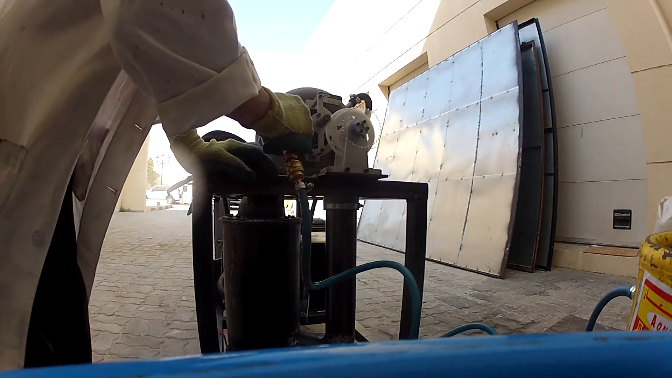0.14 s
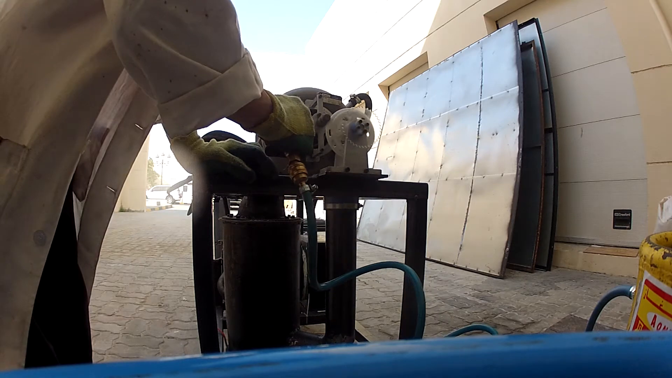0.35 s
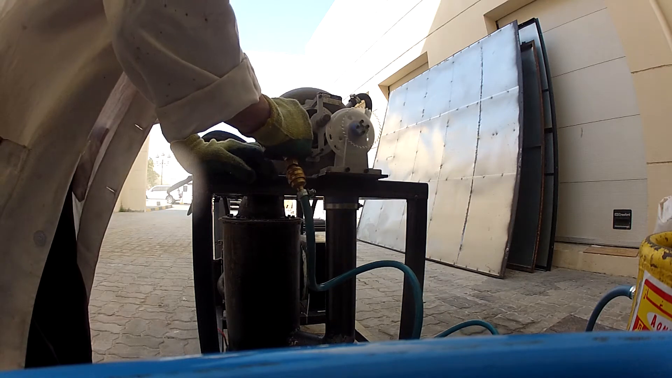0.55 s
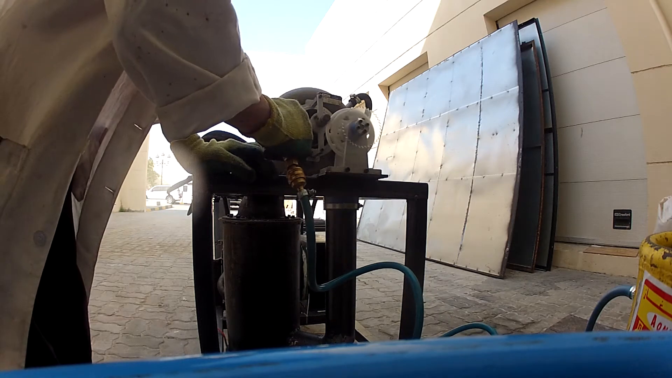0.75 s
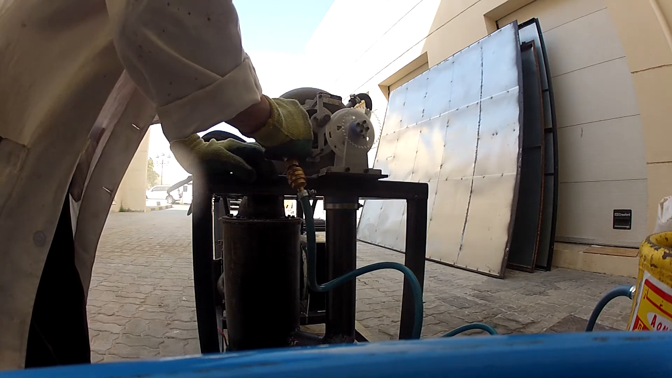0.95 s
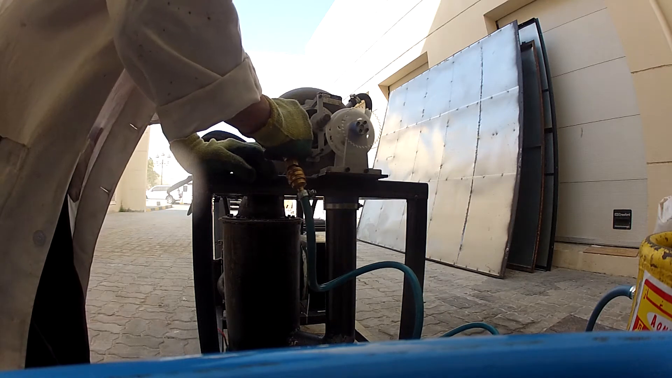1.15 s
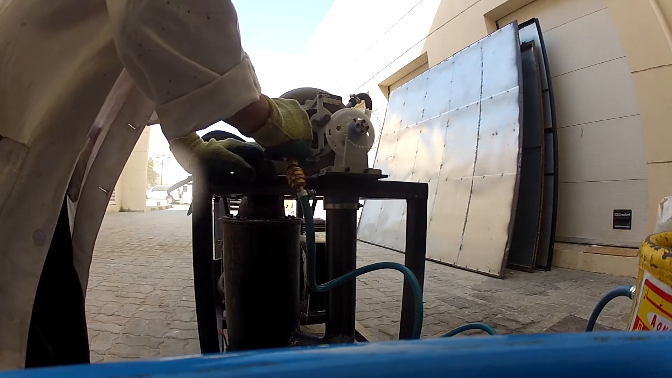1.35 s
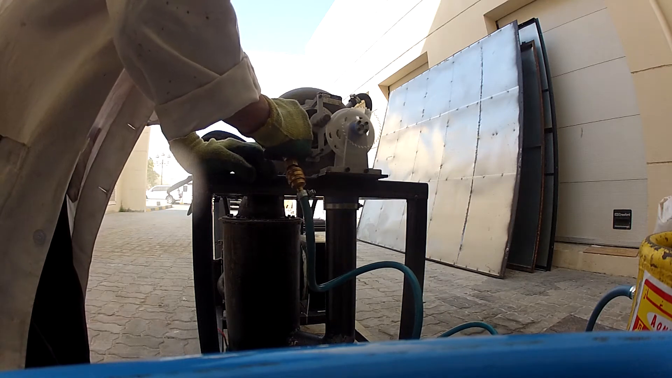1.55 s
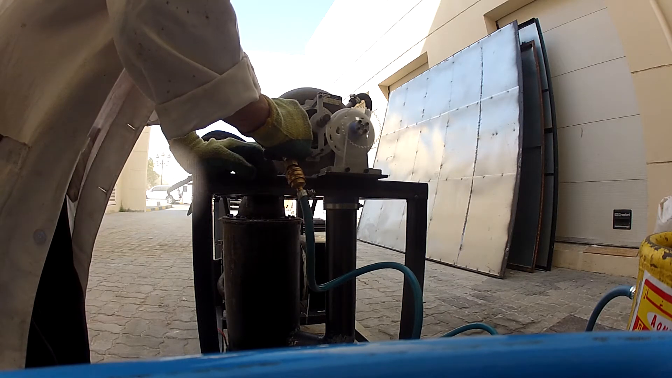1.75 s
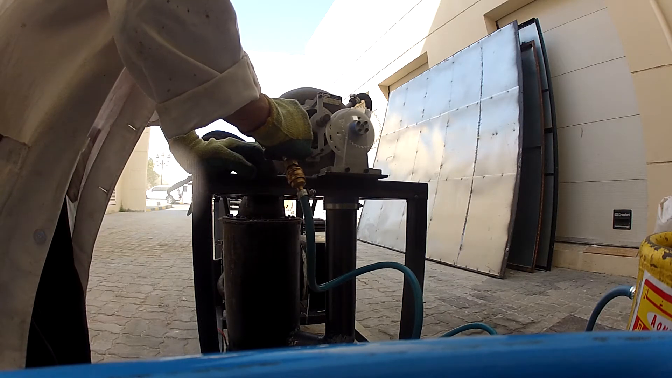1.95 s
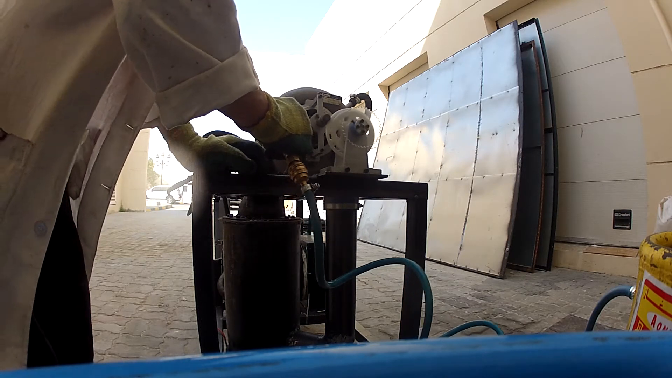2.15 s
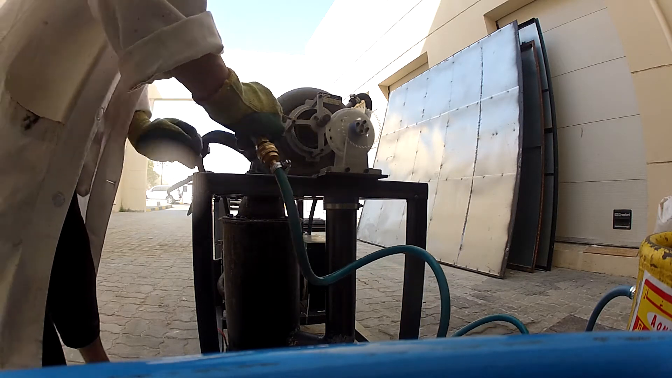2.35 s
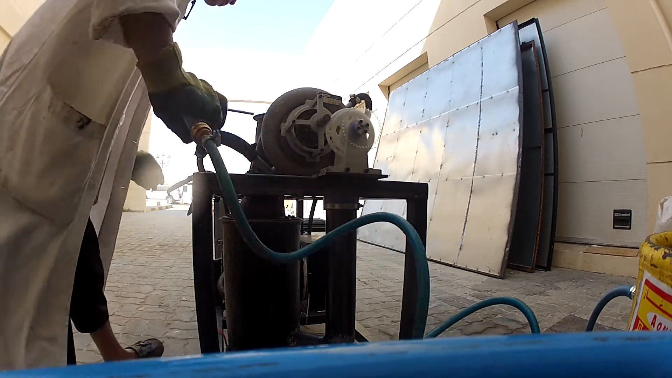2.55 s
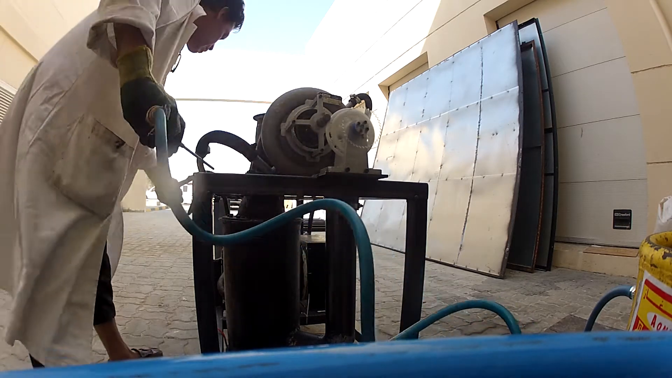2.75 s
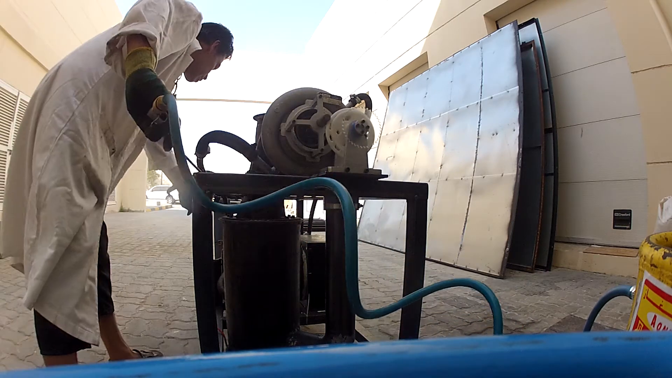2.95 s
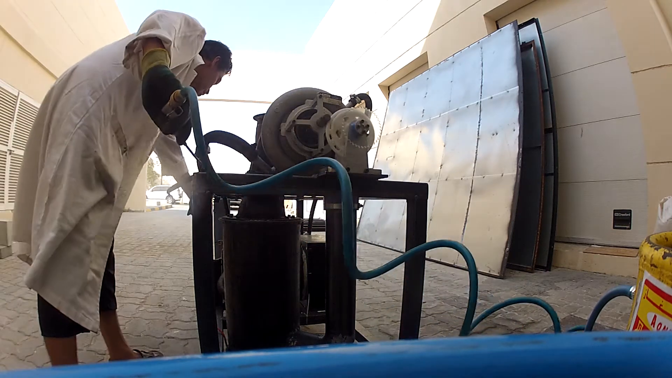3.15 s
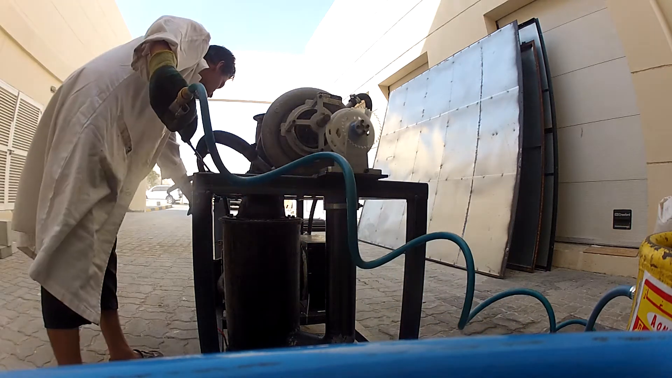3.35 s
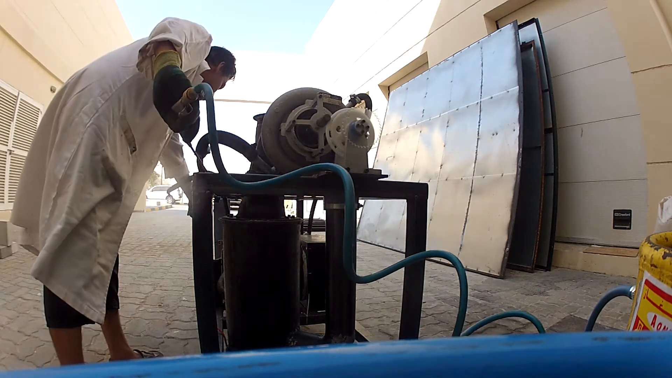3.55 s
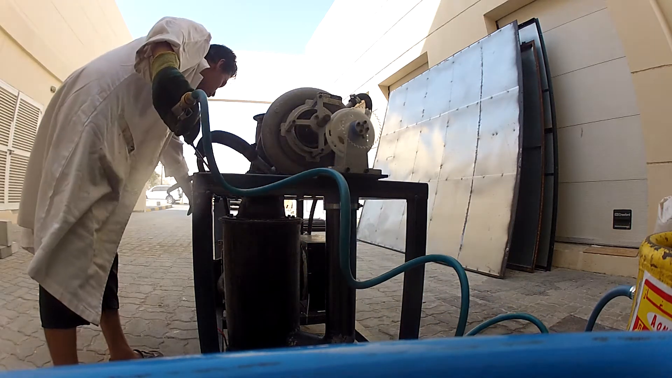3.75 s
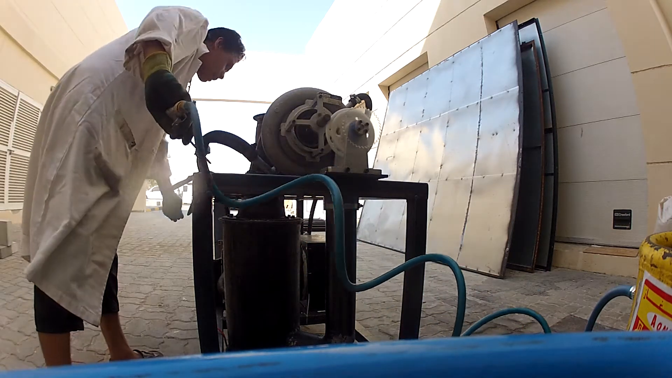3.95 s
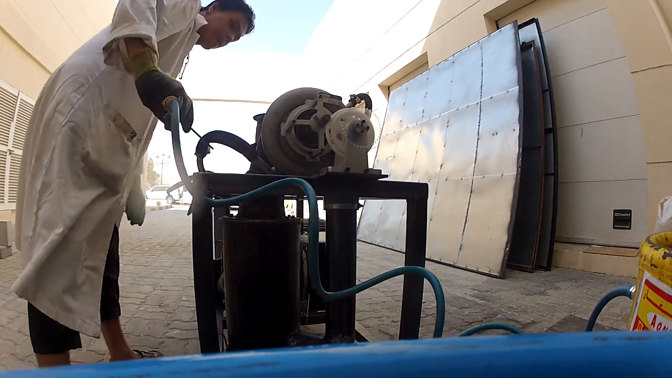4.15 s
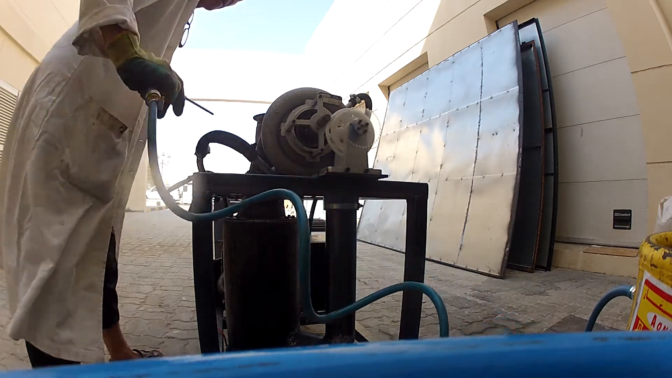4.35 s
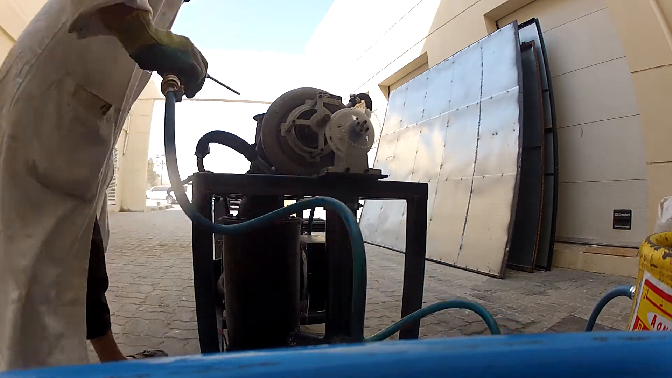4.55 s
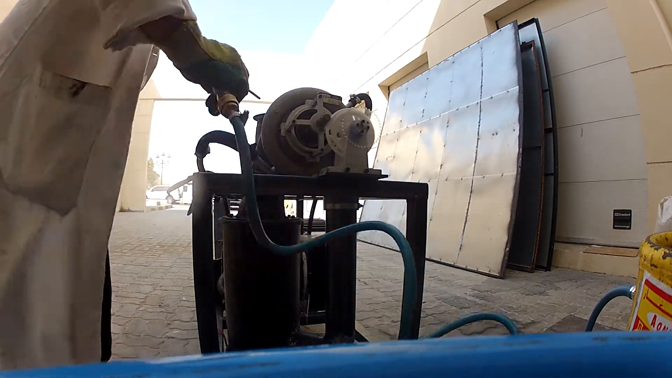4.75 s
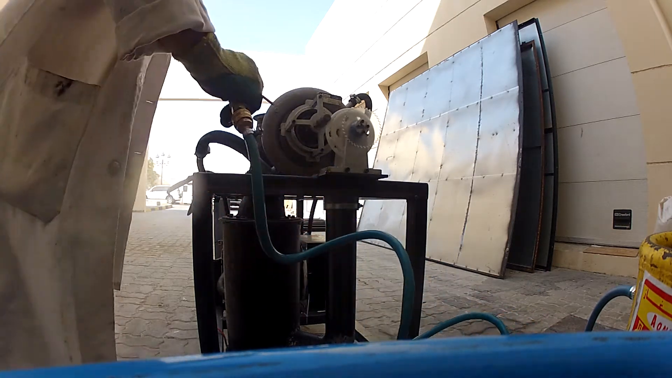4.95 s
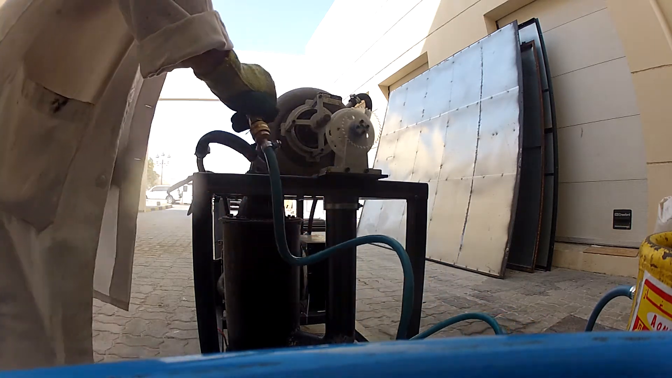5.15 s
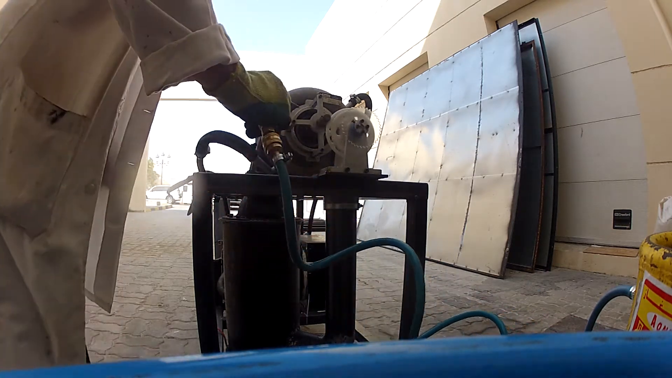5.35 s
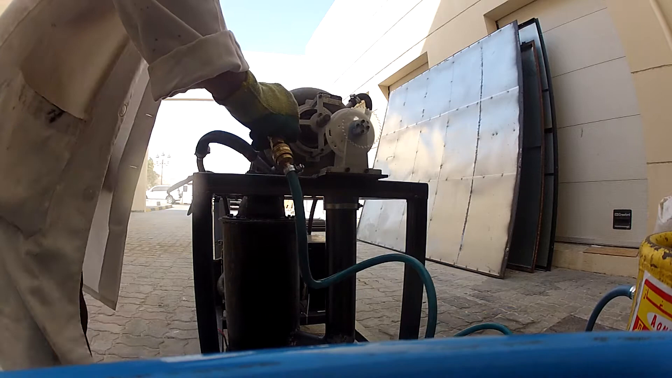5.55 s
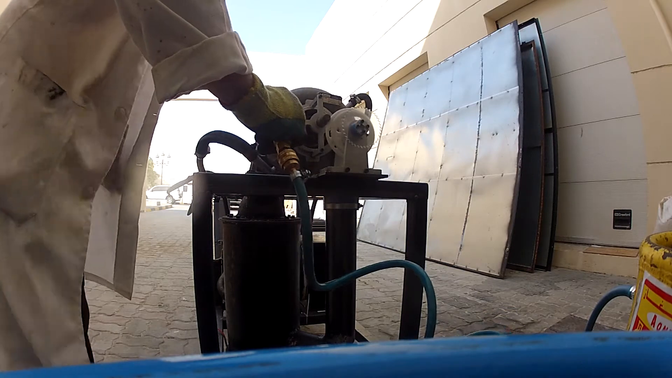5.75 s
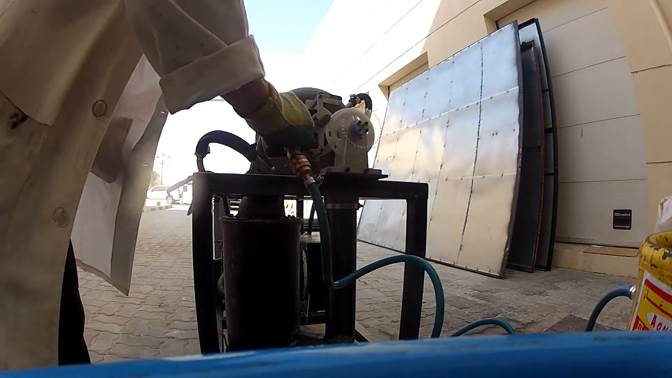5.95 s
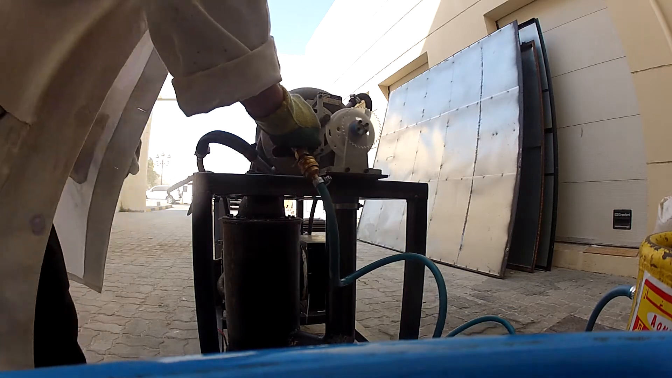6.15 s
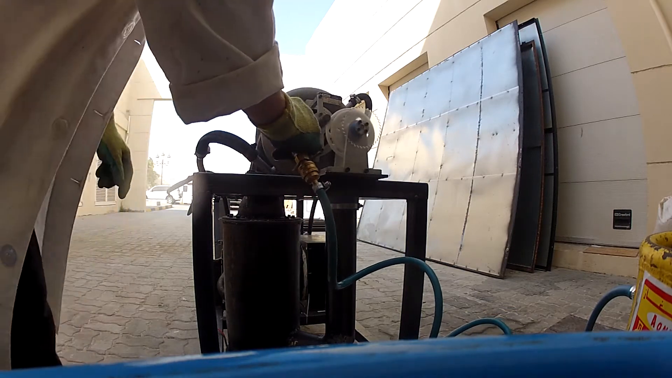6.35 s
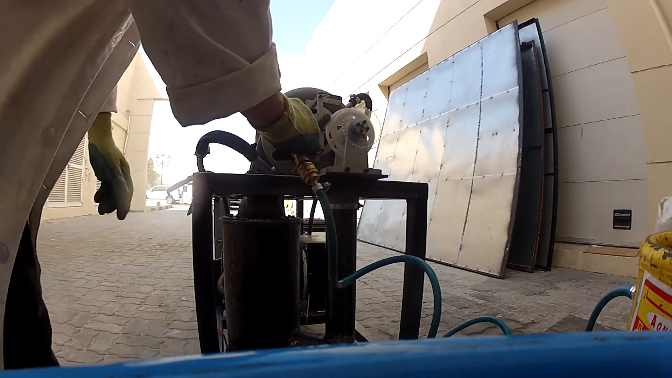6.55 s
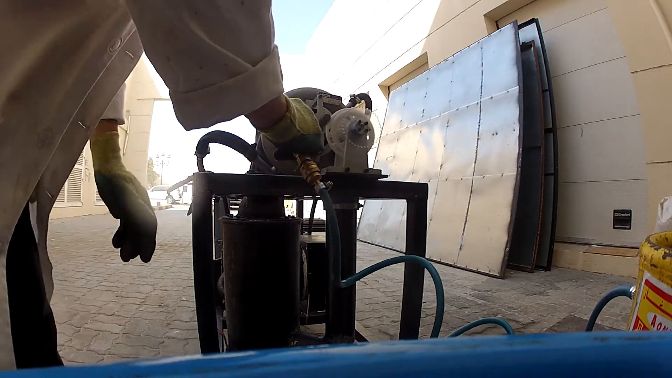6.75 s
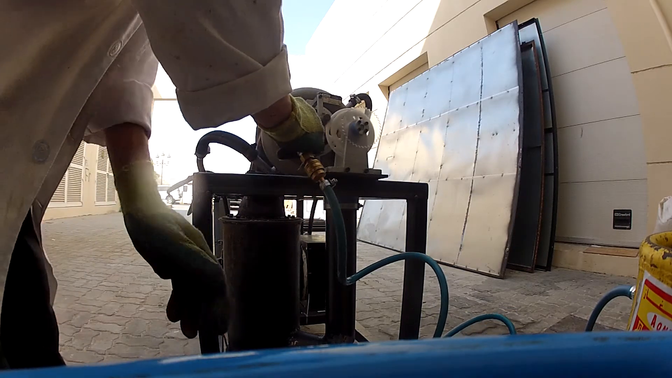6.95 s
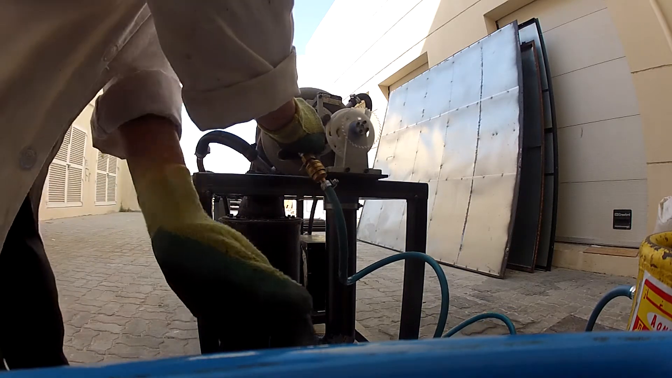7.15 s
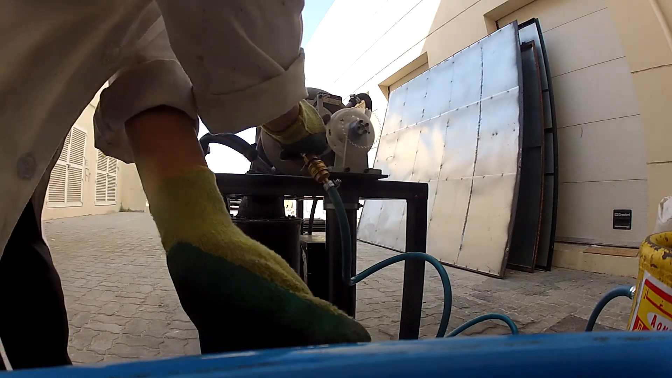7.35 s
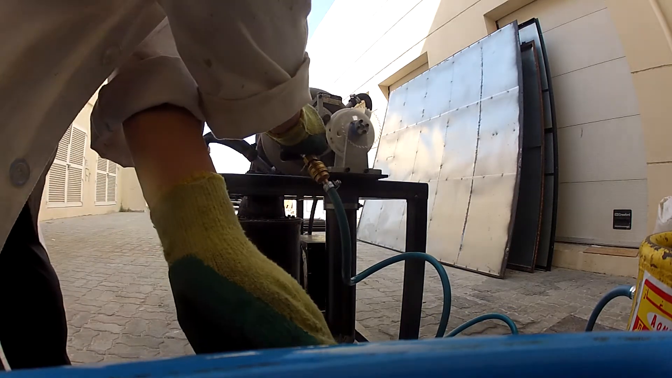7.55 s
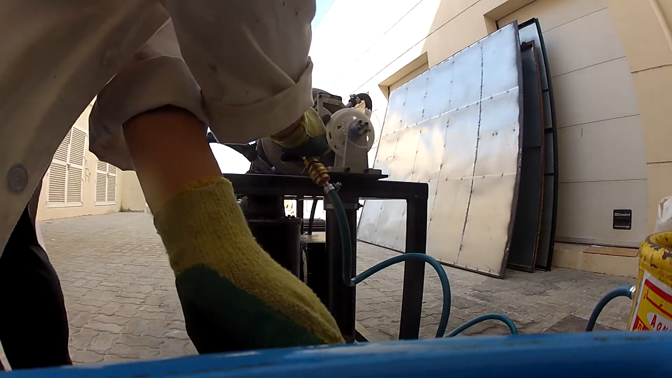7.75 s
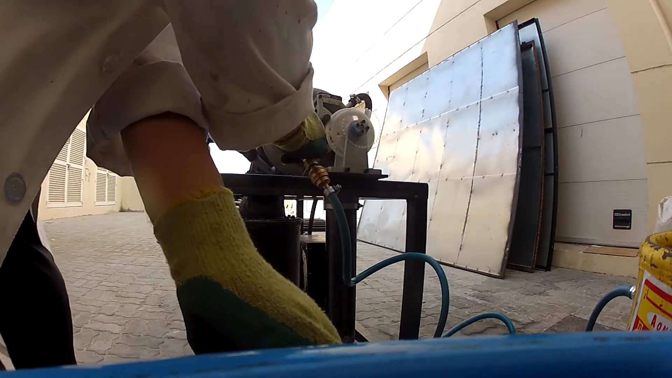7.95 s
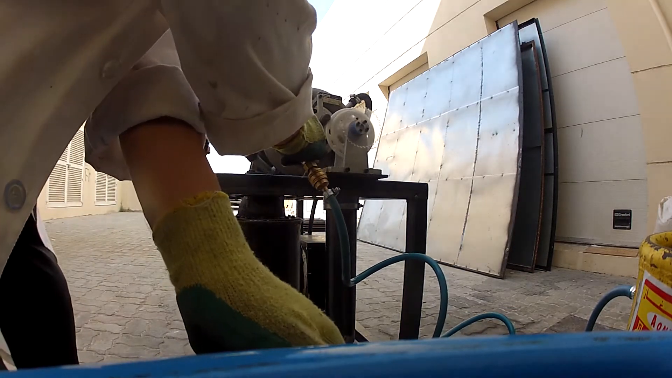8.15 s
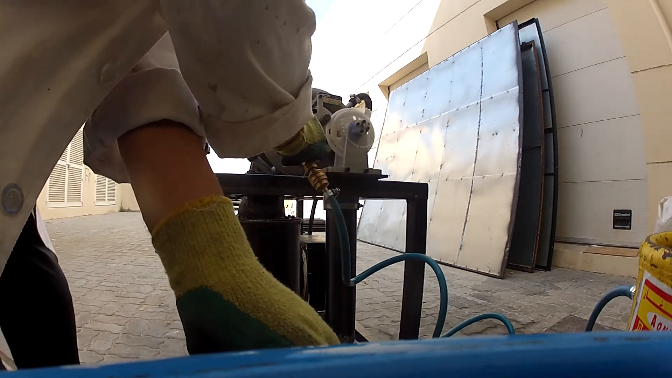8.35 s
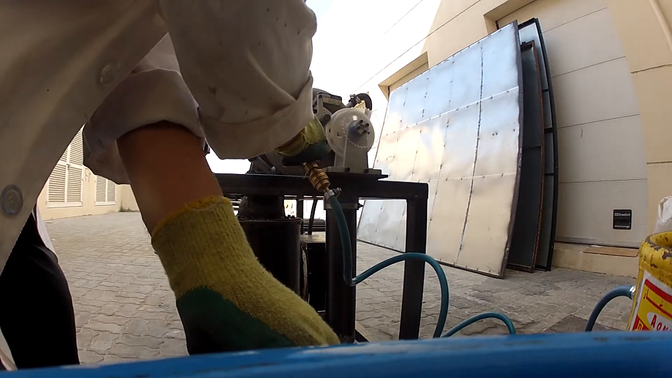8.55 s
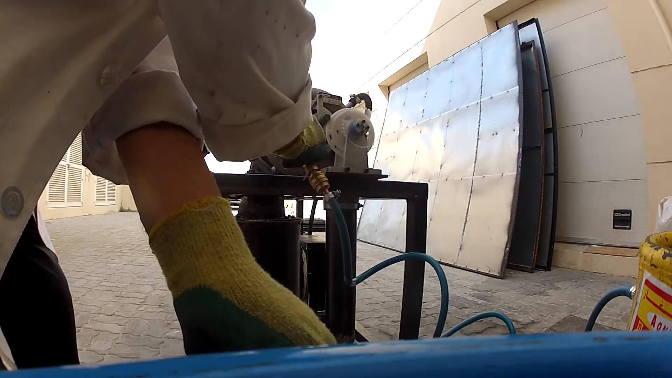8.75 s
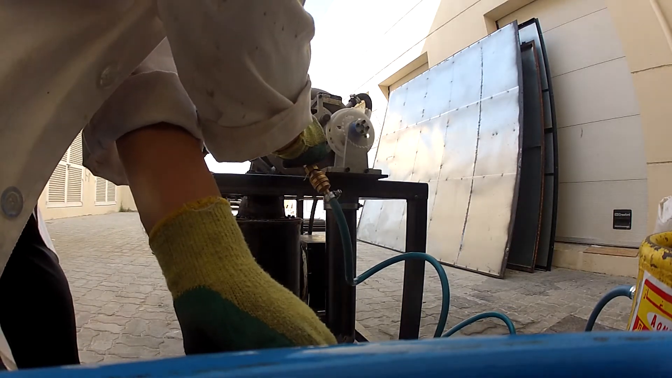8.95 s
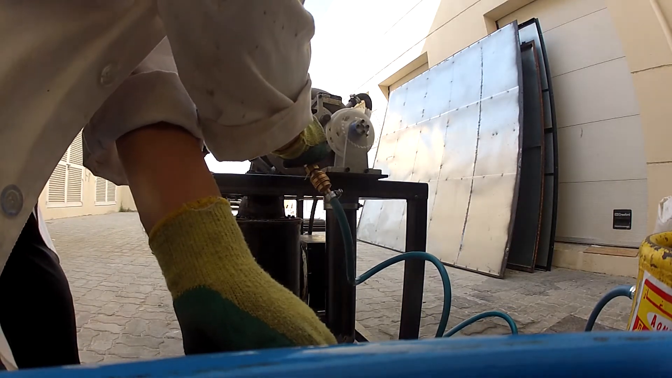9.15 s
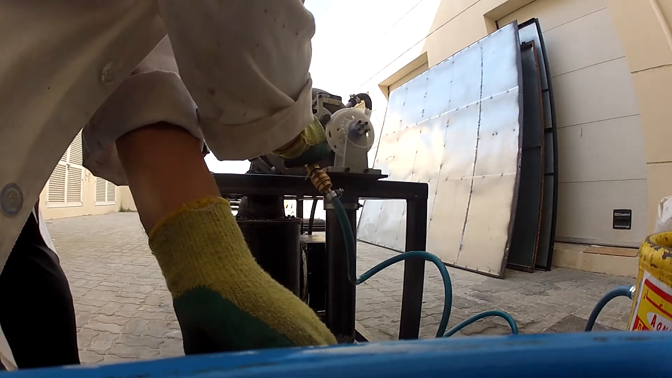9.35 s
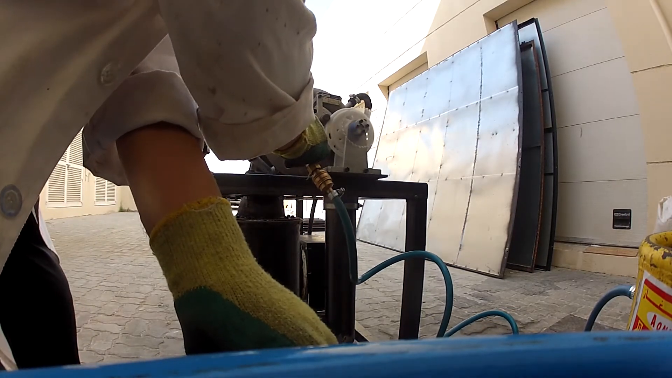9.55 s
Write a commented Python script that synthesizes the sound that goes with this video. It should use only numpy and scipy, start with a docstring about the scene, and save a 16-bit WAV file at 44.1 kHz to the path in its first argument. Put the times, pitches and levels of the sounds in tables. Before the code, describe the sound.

Compressed air blasts into a small metal turbine, its buzzy whine climbing in pitch, stops abruptly, then blows again and drives the whine higher.

```python
"""Air gun spinning a small turbine

An air gun gives two long blows into a small turbine on a steel stand in a walled yard. The jet is noise in three
bands and the rotor chops it into a rising whine of five sine orders; both ring through the same casing modes.
A faint ringing rattle, wind rumble, a distant hum, thumps and scuffs fill the gap between the blows.
A gain control turns loud moments down, and a coarse sample-and-hold mirrors the sound into the treble."""
import sys
import numpy as np
from scipy import signal
from scipy.fft import rfft, irfft, next_fast_len
from scipy.io import wavfile
from scipy.ndimage import uniform_filter1d, minimum_filter1d, map_coordinates

SR = 44100
rng = np.random.default_rng(int(sys.argv[2]) if len(sys.argv) > 2 else 0)


def persist_wave(psi):
    """Save psi, clipped to +-1, as 16-bit WAV."""
    counts = np.round(np.clip(psi, -1, 1) * 32767).astype(np.int16)
    wavfile.write(sys.argv[1], SR, np.atleast_2d(counts).T)


N = 422919


def amp(db):
    """Decibels to linear gain."""
    return 10 ** (np.asarray(db) / 20)


def unit(x):
    """Scale to an RMS of one."""
    return x / np.sqrt(np.mean(x ** 2) + 1e-20)


def curves(rows):
    """One value per sample for each column after the time."""
    times_s, *columns = np.transpose(rows)
    return [np.interp(np.arange(N) / SR, times_s, column) for column in columns]


def wobble(rate):
    """A smooth random curve with rate knots a second."""
    knots = rng.standard_normal(int(N * rate / SR) + 4)
    return map_coordinates(knots, [np.arange(N) * rate / SR])


def filtered(x, response):
    """Multiply the spectrum of x by a complex response of frequency."""
    size = next_fast_len(N + SR // 2)
    return irfft(rfft(x, size) * response(np.fft.rfftfreq(size, 1 / SR)), size)[..., :N]


def spectrum(points):
    """Gain curve through (Hz, dB) points on a log frequency axis."""
    hz, db = np.transpose(points)
    return lambda f: amp(np.interp(np.log(f + 1), np.log(hz + 1), db))


def resonance(f, hz, width):
    """Response of one damped mode, with a gain of one at its centre."""
    return 1j * f * width / (hz * hz - f * f + 1j * f * width)


def span(start, end, rise, fall):
    """Gate open from start to end, with exponential flanks (s per 60 dB)."""
    t = np.arange(N) / SR
    return amp(-60 * np.maximum(start - t, 0) / rise - 60 * np.maximum(t - end, 0) / fall)


def patchy(depth_db):
    """White noise whose strength drifts in patches of time and frequency."""
    bins = signal.stft(rng.standard_normal(N), nperseg=512)[2]
    field = rng.standard_normal(bins.shape)
    field = uniform_filter1d(uniform_filter1d(field, 8, 0), 6, 1)
    return signal.istft(bins * amp(depth_db * unit(field)), nperseg=512)[1][:N]


# Colour of the distant hum: freq_hz, gain_db (relative, on white noise)
HUM_COLOUR = [(60, -40), (130, -14), (200, -0.5), (350, -4.5), (600, -4), (850, -4.5), (1000, -25),
              (1500, -45), (2500, -120)]


def distant_hum():
    """A steady low bed: patchy noise shaped by the hum's colour."""
    return amp(-43.5) * unit(filtered(patchy(1.7), spectrum(HUM_COLOUR)))


# Fuzzy tones in the hum: pitch_hz, width_hz (of each of two passes), level_db (RMS)
HUM_DRONES = [(198.6, 15, -52.5), (285.6, 9, -60.5), (494.8, 13.5, -50.5)]


def drones():
    """Narrow bands of noise that stand out of the hum, each passed twice through one resonance."""
    out = np.zeros(N)
    for hz, width, db in HUM_DRONES:
        band = filtered(rng.standard_normal(N), lambda f: resonance(f, hz, width) ** 2)
        out += amp(db) * unit(band)
    return out


# Strength of the wind: time_s, level_db
WIND_LEVEL = [(0, -37), (.5, -34), (1.5, -35), (2.3, -38.5), (2.7, -46), (3.1, -39), (4.2, -43.5),
              (4.9, -42.5), (6.1, -43.5), (6.5, -38), (7.1, -41.5), (8.3, -42.5), (9.59, -48.5)]
# Colour of the wind rumble: freq_hz, gain_db (relative, on white noise)
WIND_COLOUR = [(12, -30), (22, -1.5), (45, -1), (90, -0.5), (150, -8), (250, -26), (500, -60), (1000, -120)]


def wind():
    """Low rumble that comes in separate lumps: noise of randomly swelling strength, then low-passed."""
    lumps = amp(4.7 * np.tanh(0.8 * wobble(18)))
    rumble = filtered(rng.standard_normal(N) * lumps, spectrum(WIND_COLOUR))
    return amp(curves(WIND_LEVEL)[0]) * unit(rumble)


# Soft thumps: time_s, peak_db (nominal), pitch_hz
HANDLING_THUMPS = [(2.321, -30, 56.5), (2.347, -21.5, 64.6), (2.417, -22.5, 113), (2.459, -26, 70.4),
                   (3.049, -31, 48.4), (3.119, -33, 56.5), (3.398, -24, 67.3), (3.423, -30, 86.1),
                   (3.719, -26, 130), (3.799, -28, 45.8), (4.101, -28, 94.2), (4.689, -28, 172),
                   (4.859, -29, 75.4), (5.524, -23, 205)]


def thumps():
    """Soft low knocks, each a dip in pressure between two small swells."""
    out, t = np.zeros(N), np.arange(SR // 8) / SR
    for time_s, db, hz in HANDLING_THUMPS:
        cycles = hz * (t - t.mean() - .003)
        pulse = np.exp(-3 * cycles ** 2) * np.cos(2 * np.pi * cycles + .5)
        out[round((time_s - t.mean()) * SR):][:len(t)] -= amp(db) * pulse
    return out


# Scuffs of hose and gloves: start_s, level_db (before the envelope), centre_hz,
# grit_db (gain on the wide noise band, relative to the level)
HOSE_SCUFFS = [(2.56, -36, 2450, -3), (2.612, -38, 2470, 0), (2.634, -41, 2480, 6), (2.68, -41, 2400, -3),
               (2.851, -37, 2360, -4), (2.87, -42, 2470, -5), (3.355, -37.5, 1680, 7),
               (3.385, -40, 2380, 0), (3.733, -38, 1700, 3), (3.797, -42, 3840, 0), (4.509, -41, 2510, -7),
               (4.755, -39, 2360, 0), (5.18, -41, 2310, -4)]
SCUFF_S, SCUFF_RISE_S = 0.03, 0.0042  # time to fall 20 dB; time constant of the onset


def scuffs():
    """Short rubs: one noise burst heard through a resonance and through a wide gritty band."""
    out, t = np.zeros(N), np.arange(SR // 8) / SR
    wide_band = signal.butter(2, [1500, 5000], "band", fs=SR)
    envelope = amp(-20 * (t / SCUFF_S) ** 2) * (1 - np.exp(-t / SCUFF_RISE_S))
    for start, db, hz, grit_db in HOSE_SCUFFS:
        noise = rng.standard_normal(len(t))
        b, a = signal.iirpeak(hz, 4, SR)
        burst = unit(signal.lfilter(b, a, noise)) + amp(grit_db) * signal.lfilter(*wide_band, noise)
        out[round(start * SR):][:len(t)] += amp(db) * envelope * burst
    return out


LEAK_DB, LEAK_STOPS_S = -51.5, 5


def leak():
    """A faint whistling air leak: unsteady noise through one narrow resonance."""
    hiss = rng.standard_normal(N) * amp(2 * wobble(30))
    whistle = filtered(hiss, lambda f: resonance(f, 3863, 60))
    return amp(LEAK_DB) * span(0, LEAK_STOPS_S, 1, 1.6) * unit(whistle)


# Modes of the stand: freq_hz, width_hz, gain_db (relative)
STAND_MODES = [(196, 13, -7.5), (287, 32, -8), (350, 26, -3.5), (512, 30, 1.5), (782, 19, 4),
               (1530, 150, -22), (2120, 63, -32), (2366, 75, -2), (2550, 160, -7.5), (3310, 80, -8),
               (3870, 540, -14), (4980, 96, -9.5)]
# Colour of the broad part of the rattle: freq_hz, gain_db (relative, on white noise)
RATTLE_COLOUR = [(600, -35), (950, -10), (1500, -7.5), (1760, -15), (2400, -3), (2900, -13.5), (3600, -10),
                 (4500, -20.5), (5200, -11), (5950, -21.5), (8000, -120)]
RUNG_DB, BROAD_DB = -40, -43  # levels until the coasting starts
COAST_S, SLOWS_DB_PER_S = 2.16, 1.66  # from then on the rattle weakens as the rotor slows


def rattle():
    """Noise with light ticks, about thirty a second, ringing the stand, plus a broad rustle."""
    coasting_s = np.clip(np.arange(N) / SR - COAST_S, 0, 3.2)
    ticks = np.cos(np.pi * np.cumsum(32 * (1 + 0.2524 * wobble(20))) / SR) ** 16
    tick_strength = amp(4 * np.tanh(wobble(30)))
    shake = rng.standard_normal(N) * (.8 + 1.4 * ticks * tick_strength)

    def stand(f):
        """Sum of the modes with alternating signs."""
        return sum((-1) ** k * amp(db) * resonance(f, hz, width)
                   for k, (hz, width, db) in enumerate(STAND_MODES))

    rung = filtered(shake, stand)
    broad = filtered(.4 * shake + rng.standard_normal(N), spectrum(RATTLE_COLOUR))
    both = amp(RUNG_DB) * unit(rung) + amp(BROAD_DB) * unit(broad)
    return amp(-SLOWS_DB_PER_S * coasting_s) * both


# Modes of the casing: freq_hz, width_hz, gain_db, sign (signed weight)
CASING_MODES = [(197.6, 50, -16, 0.57), (343.8, 37.7, -6, 0.93), (488.6, 46.8, -2, -0.85),
                (506.6, 81.3, -6, 0.86), (762, 110, -11.5, 0.88), (911, 67, -15, -1.18),
                (1060, 32, -16, -1.17), (1237, 125, -9.5, 0.87), (1503, 31, -17, 0.88),
                (2046, 332, -6.5, 0.9), (2380, 308, -3.5, -0.97), (2518, 319, -6.5, 0.93),
                (3132, 207, -9, 0.85), (3772, 518, 0, -1.037), (4550, 790, 1.9, 0.99),
                (4858, 68, 4.5, -1.13), (5180, 210, -11, 0.98), (5526, 227, -2, 1)]


def casing(f):
    """Response of the turbine casing: a signed sum of damped modes."""
    return sum(sign * amp(db) * resonance(f, hz, width) for hz, width, db, sign in CASING_MODES)


# Rotor speed: time_s, pitch_hz (of the first order)
ROTOR_SPEED = [(0, 74), (.39, 112.9), (.81, 162.1), (1.28, 217.4), (1.79, 271.3), (2.27, 318.9),
               (5.5, 188.5), (5.99, 241.4), (6.56, 298.5), (7.04, 348.3), (7.59, 399.7), (8.14, 454.8),
               (8.7, 506.3), (9.15, 543), (9.59, 572)]


def rotor():
    """Speed of the rotor (Hz) and its slightly unsteady phase (radians)."""
    speed, = curves(ROTOR_SPEED)
    return speed, 2 * np.pi * np.cumsum(speed * (1 + 0.00093 * wobble(12))) / SR


# Blows, for jet and whine: opens_s, closes_s, roar_sets_in_s, hiss_db,
# roar_db (low band, relative to the hiss), rasp_db (middle band, relative to the hiss)
VALVE_BLOWS = [(0, 2.256, -.5, -17.5, -6.5, -8.5), (5.519, 9.59, 5, -17.5, -8, -7)]
# Nozzle aim, for jet and whine: time_s, miss (share of the jet missing the blades, 0-1), rasp_change_db
NOZZLE_AIM = [(0, 0.13, -1.5), (.2, 0.02, 0), (.42, 0.02, 0.5), (2.02, 0.02, -0.3), (2.26, 0.18, 1.5),
              (5.5, .95, 2.5), (5.72, .8, 3), (5.9, .65, 1), (6.0, 0.39, 0), (6.15, 0.38, 0),
              (6.25, 0.08, 1), (6.42, .12, 0.7), (6.9, 0, 0.3), (7.2, 0, 5.5), (7.5, 0.02, -0.5),
              (8.02, 0.06, 1), (8.11, 0, 0), (8.25, 0.11, 3), (8.4, 0, 0), (8.66, 0.09, -1.8),
              (8.95, 0.03, -0.3), (9.59, .03, 0)]
MISS_ROAR_DB, ROAR_SINKS_DB_PER_S = -6.5, 1  # roar before it sets in; its fade as the rotor gives way
SPIT_DB, SPIT_S = 5.5, 0.024  # raspy spit as the valve opens: peak boost, time constant


def air_jet(turn):
    """Turbulent jet noise, pulsed by the blades and rung by the casing, mixed from three bands."""
    def below(hz):
        """Steep low-pass response."""
        return lambda f: 1 / (1 + (f / hz) ** 12)

    t = np.arange(N) / SR
    flicker = amp(0.42 * wobble(9) + 0.19 * wobble(60))
    jet = flicker * patchy(0.77) * (1 + 0.16 * np.cos(turn))
    jet = filtered(jet, casing)
    low, body = filtered(jet, below(1820)), filtered(jet, below(3275))
    roar, rasp, fizz = unit(low), unit(body - low), unit(jet - body)
    _, rasp_change_db = curves(NOZZLE_AIM)
    out = np.zeros(N)
    for opens, closes, sets_in, hiss_db, roar_db, rasp_db in VALVE_BLOWS:
        sinking_db = ROAR_SINKS_DB_PER_S * np.maximum(t - sets_in, 0)
        roar_now_db = roar_db + MISS_ROAR_DB * (t < sets_in) - sinking_db
        spit_db = SPIT_DB * np.exp(-abs(t - opens) / SPIT_S)
        rasp_now_db = rasp_db + rasp_change_db + spit_db
        bands = fizz + amp(rasp_now_db) * rasp + amp(roar_now_db) * roar
        out += span(opens, closes, 0.025, 0.071) * amp(hiss_db) * bands
    return out


# Whine, one row a blow: order1_db to order5_db (at the reference speed, before outlet and casing)
WHINE_ORDERS = [(.8, -12.5, -13.5, -19, -25), (0.47, -12, -14.5, -21, -21)]
# Growth with speed, one row a blow: order1 to order5 (dB per octave)
WHINE_GROWTH = [(4.5, -5.9, -2.5, -0.3, -1), (-1, -5, -0.5, 4, -1.5)]
# How the chopped flow leaves the casing: freq_hz, gain_db
OUTLET_COLOUR = [(145, -17.5), (190, -4.5), (232, -9), (265, -7.5), (300, -1.5), (335, 0.5), (362, 2.5),
                 (392, 1.5), (456, 3), (470, 2.7), (488, 6), (505, 3), (594, 5.5), (615, -1.5), (680, 6.5),
                 (890, 6), (945, -2), (1040, 7), (1100, -5.5), (1160, 2), (1270, 2.5), (1690, -5.5),
                 (2030, -1.5), (2220, 5), (2650, 7), (2900, -12)]
REFERENCE_HZ = 350
MISS_WHINE_DB, MISS_BLURS_DB = -27.5, -8  # at a full miss: all orders; more for each order above the first


def rotor_whine(speed, turn):
    """Sine orders of the rotor chopping the flow, weaker when the jet misses, through outlet and casing."""
    miss, _ = curves(NOZZLE_AIM)
    octaves = np.log2(speed / REFERENCE_HZ)
    chopped = np.zeros(N)
    for (opens, closes, *_), levels_db, slopes in zip(VALVE_BLOWS, WHINE_ORDERS, WHINE_GROWTH):
        gate = span(opens, closes + 0.0098, .02, 0.11) * amp(MISS_WHINE_DB * miss)
        for k, (db, slope) in enumerate(zip(levels_db, slopes)):
            tone = np.sin((k + 1) * turn + rng.uniform(0, 2 * np.pi))
            order_db = db + MISS_BLURS_DB * k * miss + slope * octaves + 1.02 * wobble(25)
            chopped += gate * amp(order_db) * tone
    return filtered(chopped, lambda f: casing(f) * spectrum(OUTLET_COLOUR)(f))


WALL_S, WALL_DB, WALL_HZ = .0226, -19.5, 790  # delay, low-frequency level, frequency of half gain


def wall_echo(x):
    """One dull echo off the nearest wall: a delay with a low-pass."""
    def wall(f):
        """Delay as a phase ramp, with falling treble."""
        return amp(WALL_DB) * np.exp(-2j * np.pi * f * WALL_S) / (1 + (f / WALL_HZ) ** 4)

    return filtered(x, wall)


def yard(x):
    """Diffuse answer from the walls: a decaying noise tail, starting 400 samples late."""
    t = np.arange(SR // 2) / SR
    tail = rng.standard_normal(len(t)) * amp(-60 * t / 0.92)
    return signal.fftconvolve(np.pad(x, (400, 0)), tail / np.linalg.norm(tail))[:N]


def scene():
    """Sum every layer and send the same signal to both channels."""
    speed, turn = rotor()
    hiss, whine = air_jet(turn), rotor_whine(speed, turn)
    walls = wall_echo(whine) + yard(amp(-20.5) * hiss + amp(-26) * whine)
    background = distant_hum() + drones() + wind() + thumps() + scuffs()
    mono = background + leak() + rattle() + walls + hiss + whine
    return np.array([mono, mono])


LOUD_DB, SQUEEZE = -11, 0.67  # threshold; share of the excess taken away
HOLD_S, REACT_S = 0.052, 0.04  # hold; time constant of the gain


def levelled(x):
    """Gain control: part of what exceeds the threshold is taken away, a little late, and held for a moment."""
    power = abs(uniform_filter1d(x ** 2, SR // 50))
    excess_db = np.maximum(10 * np.log10(power + 1e-12) - LOUD_DB, 0)
    half = round(HOLD_S * SR / 2)
    held_db = -minimum_filter1d(-excess_db, 2 * half + 1, origin=half)  # running maximum
    keep = np.exp(-1 / (REACT_S * SR))
    return x * amp(-SQUEEZE * signal.lfilter([1 - keep], [1, -keep], held_db))


HOLD_HZ, STEPS, TOP_HZ = 12000, 4, 15350  # sampling rate; steps per held value; upper limit


def record(dry):
    """Level, band-limit, sample at a low rate and hold each value: images appear around the sampling rate."""
    def band_limit(f):
        """Steep low-pass, closed above half the sampling rate."""
        return 1 / np.sqrt(1 + (f / 5700) ** 40) * (f < HOLD_HZ / 2)

    def hold(f):
        """Treble loss of a held value built from finer steps."""
        return np.sinc(f / HOLD_HZ) / np.sinc(f / HOLD_HZ / STEPS)

    base = filtered(levelled(dry), band_limit)
    sampled = base * (1 + 2 * np.cos(2 * np.pi * HOLD_HZ * np.arange(N) / SR))
    return filtered(sampled, lambda f: hold(f) * (f < TOP_HZ))


dry = scene()
out = record(dry)
persist_wave(out)
```